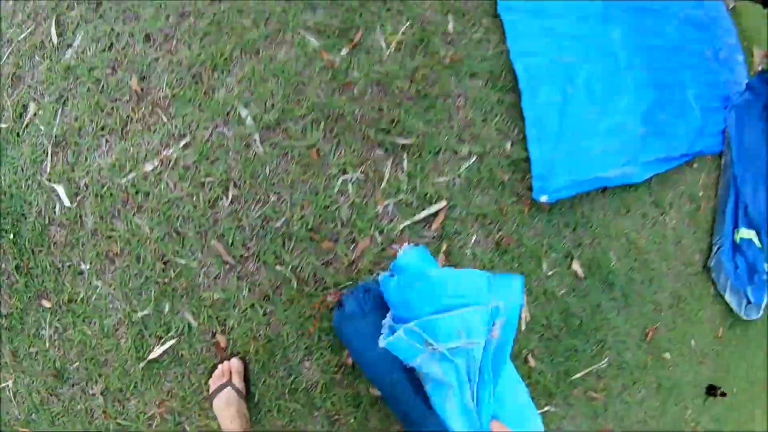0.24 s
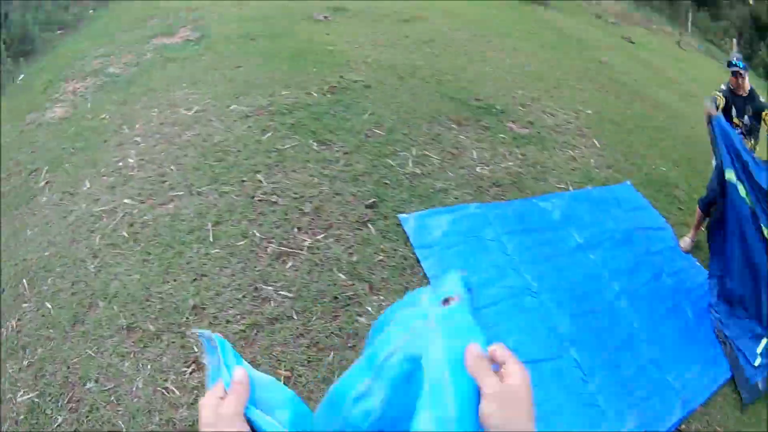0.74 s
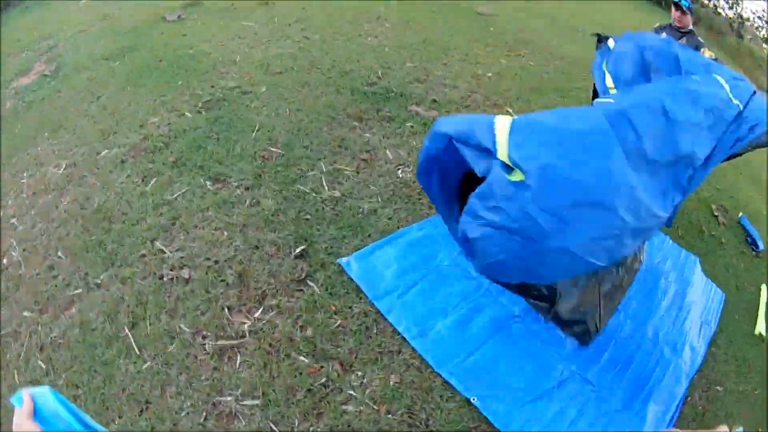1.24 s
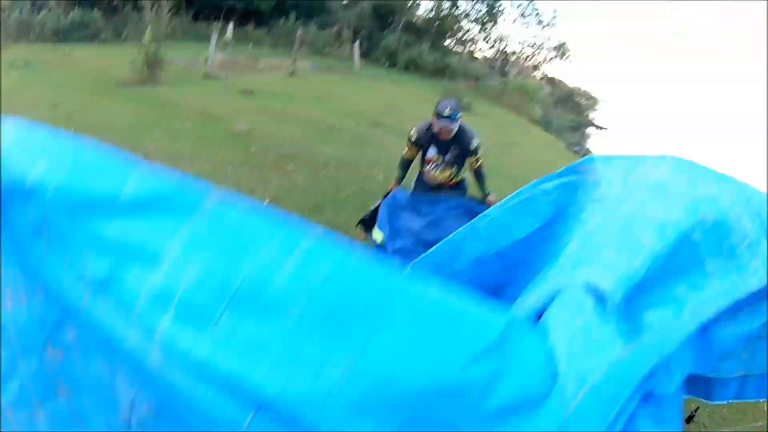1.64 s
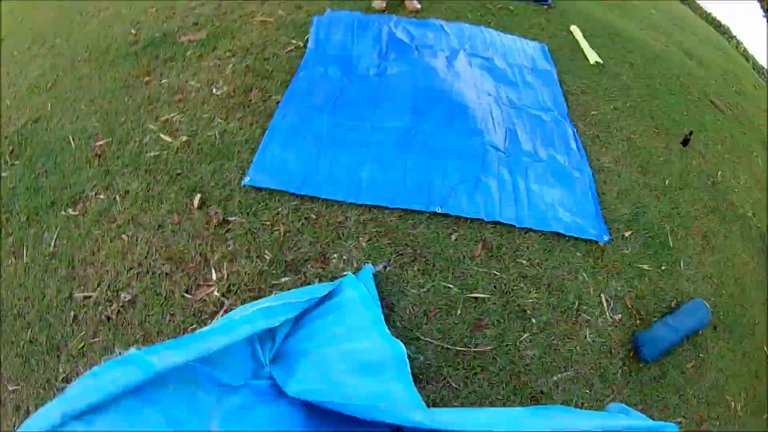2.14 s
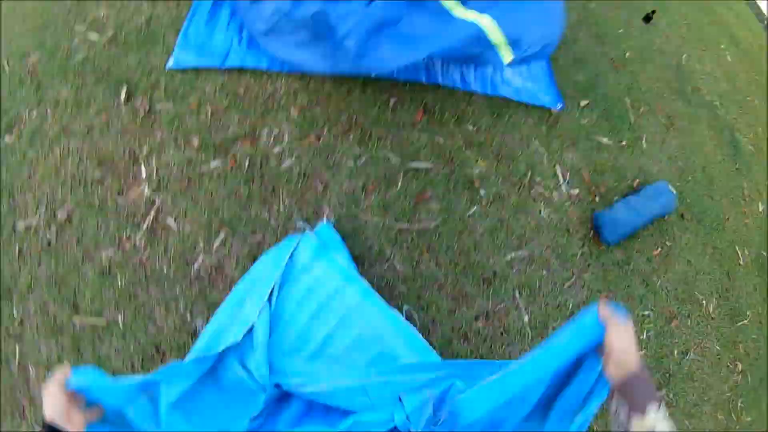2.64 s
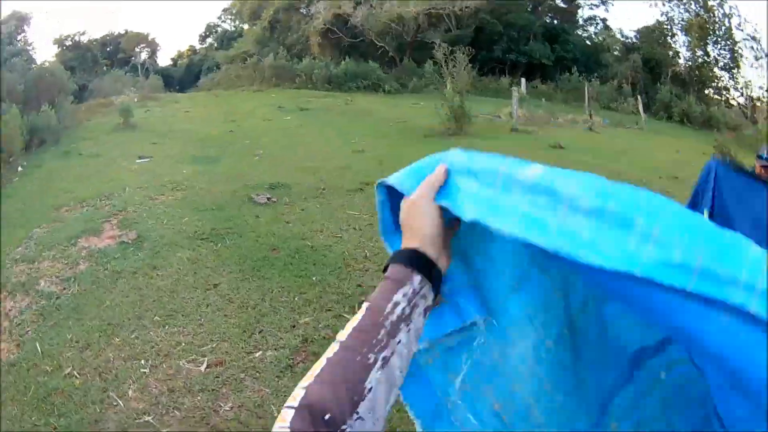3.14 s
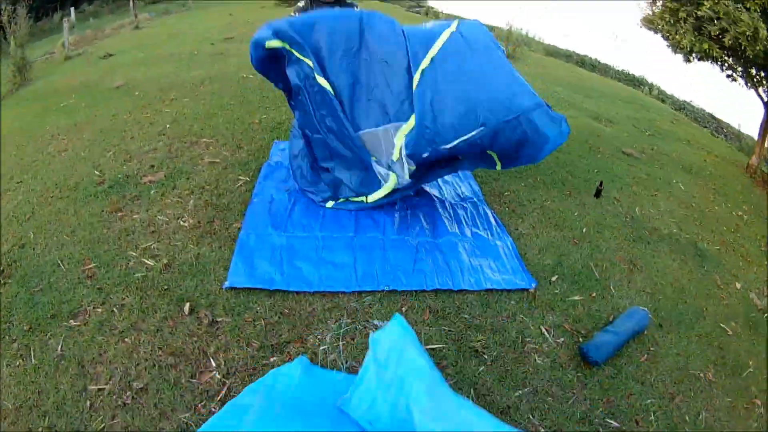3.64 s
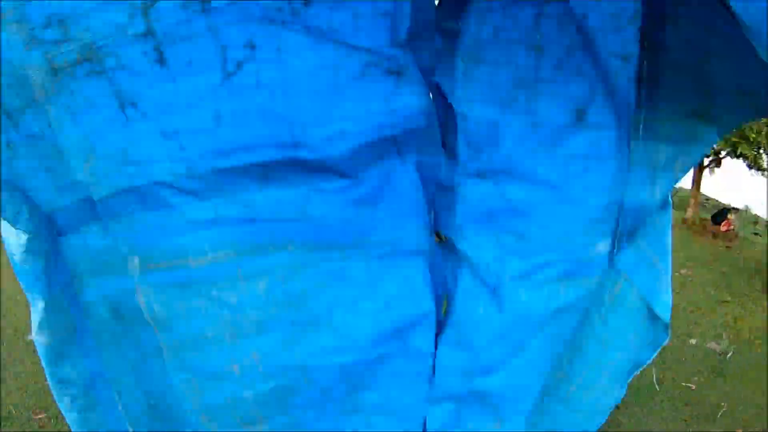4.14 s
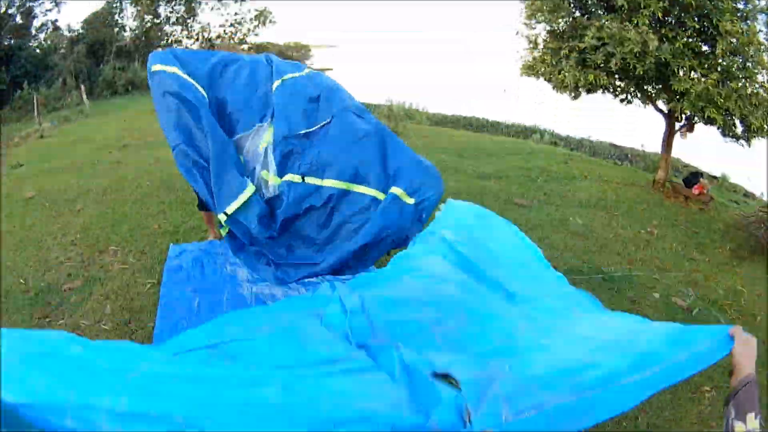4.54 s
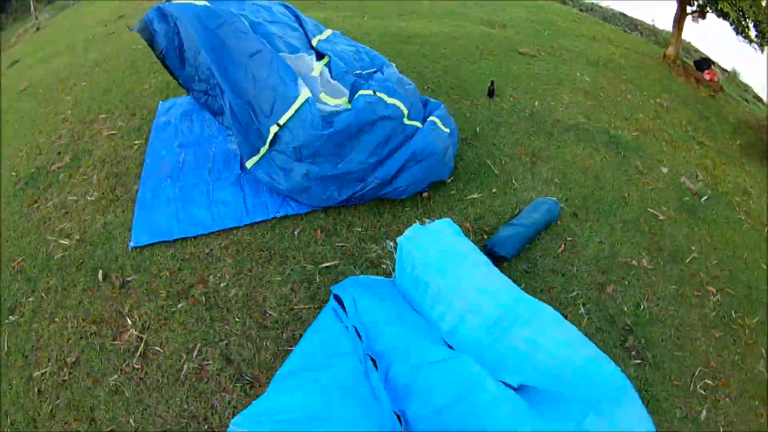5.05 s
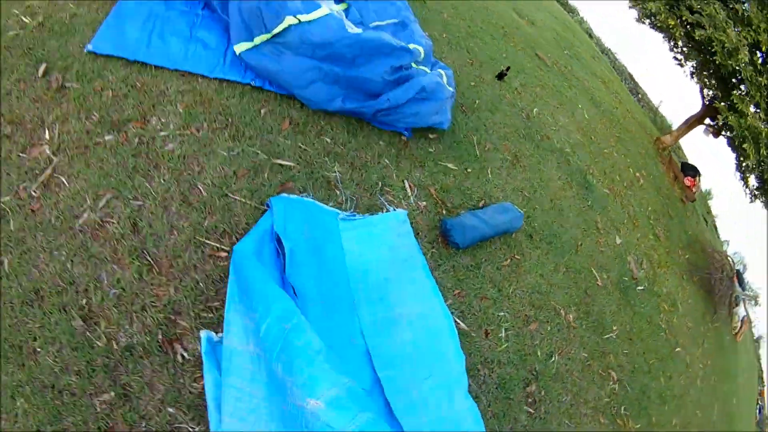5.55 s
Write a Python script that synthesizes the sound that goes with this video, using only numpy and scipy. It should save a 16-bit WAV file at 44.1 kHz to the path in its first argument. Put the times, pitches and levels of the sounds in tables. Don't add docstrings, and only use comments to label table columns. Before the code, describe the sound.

A large plastic tarp is handled and shaken at arm's length outdoors, dry and without echo. Small rustles lead into bursts of dense crackle with short woody pops, bright ticks and dull air-pushing flaps. The strongest snap comes near the first second, another hard one just after four, then it subsides into light crinkling. Soft air hiss, puffs on the microphone and a distant machine hum lie behind.

```python
import sys
import numpy as np
from scipy import signal
from scipy.fft import rfft, irfft, next_fast_len
from scipy.io import wavfile
from scipy.ndimage import uniform_filter1d, map_coordinates

SR = 44100
rng = np.random.default_rng(int(sys.argv[2]) if len(sys.argv) > 2 else 0)


def store_pcm(level_fs):
    pcm = np.round(np.clip(level_fs, -1, 1) * 32767).astype(np.int16)
    wavfile.write(sys.argv[1], SR, np.atleast_2d(pcm).T)


def invert_db(level):
    return 10 ** (np.asarray(level, dtype=float) / 20)


N = 255824

# (frequency [Hz], level [dB per Hz])
SHEET = [(24, -32), (45, -20.5), (250, -5.5), (370, -6.5), (850, -4.5), (2050, -2.5), (3200, -9),
         (4700, -16), (5800, -19.5), (7700, -27.5), (9200, -25), (11800, -34), (15500, -49)]
# (time [s], peak [dB], pitch [Hz], length [ms])
POPS = [(0.0993, -38, 2070, 0.99), (0.2271, -27, 990, 1.7), (0.433, -42, 2080, 1.2),
        (0.6851, -28, 2000, 1.2), (0.696, -25, 2200, 1.3), (0.788, -10, 1580, 0.77),
        (0.829, -19, 1450, 1.1), (0.9794, -28, 1530, 1.8), (1.546, -27, 970, 3.6), (1.698, -27, 1650, 1.2),
        (1.7263, -18, 1160, 1.1), (1.7345, -26, 1290, 1), (1.7986, -14, 850, 1.4), (1.8177, -25, 970, 1.1),
        (2.04, -33, 1410, 2.1), (2.1361, -25.5, 1190, 1.1), (2.1484, -27, 1120, 1.8),
        (2.2174, -27, 1530, 0.82), (2.7111, -25, 1400, 0.84), (2.7906, -24, 1000, 1.8),
        (3.1081, -28, 1430, 1.3), (3.713, -24, 1370, 2.1), (3.8794, -19.5, 1110, 0.89),
        (4.1709, -11.5, 970, 5), (4.7628, -37, 1500, 2.3), (4.7774, -35, 1890, 0.69),
        (4.9568, -33, 1050, 1.6), (5.4312, -34.5, 1500, 1), (5.4762, -30, 1410, 1.2)]


def unit(x):
    return x / np.sqrt(np.mean(x ** 2) + 1e-20)


def along(points, hz):
    f, v = np.transpose(points)
    return np.interp(np.log(hz + 1), np.log(f + 1), v)


def in_time(s, values):
    return np.interp(np.arange(N) / SR, s, values)


def wobble(rate):
    knots = rng.standard_normal(400)
    return map_coordinates(knots, [np.arange(N) * rate / SR], mode="wrap")


def coloured(x, gain):
    m = 2 * next_fast_len(N // 2 + 4096)
    cepstrum = irfft(np.log(gain(np.fft.rfftfreq(m, 1 / SR)) + 1e-6), m)
    cepstrum[1:m // 2] *= 2
    cepstrum[m // 2 + 1:] = 0
    return irfft(rfft(x, m) * np.exp(rfft(cepstrum)), m)[:N]


def shaped(bumps):
    return lambda hz: invert_db(sum(db * np.exp(-.5 * ((hz - c) / w) ** 2) for c, w, db in bumps))


def snaps(centre_s, peak, hz, length_ms, size, turn=1):
    t = np.arange(-size, size) / SR
    hump = np.cos(np.pi * np.clip(t / length_ms[:, None] * 1000, -.5, .5)) ** 2
    phase = turn * rng.random((len(hz), 1))
    wave = peak[:, None] * hump * np.cos(2 * np.pi * (hz[:, None] * t + phase))
    at = (centre_s * SR).astype(int)[:, None] + np.arange(2 * size)
    return np.bincount(at.ravel(), wave.ravel(), N + SR)[size:N + size]


def single(rows, size):
    s, peak_db, hz, length_ms = np.transpose(rows)
    return snaps(s, invert_db(peak_db), hz, length_ms, size)


def humps_db(rows):
    s, db, length_ms = np.transpose(rows)
    return snaps(s, db, 0 * s, length_ms, size=4096, turn=0)


def outdoors():
    # (frequency [Hz], level [dB per Hz])
    air_colour = [(15, -19), (25, -7.5), (233, 3.5), (305, -11), (1380, 2.5), (2060, -0.5), (5570, -34),
                  (7910, -24), (15500, -30)]
    # (time [s], level [dB])
    puff_levels = [(0, -77), (.32, -61), (.75, -88), (.86, -63), (1.4, -59.5), (1.87, -56), (1.94, -70),
                   (2.2, -57), (2.64, -66), (2.73, -50.5), (3.1, -62), (3.6, -71), (4.13, -67), (4.33, -64),
                   (4.55, -61.5), (4.95, -68), (5.23, -58.5), (5.8, -69)]
    # (frequency [Hz], level [dB per Hz])
    buffet_colour = [(12, -48), (25, -4), (55, -7), (90, -2), (200, -44.5), (400, -80)]
    # (frequency [Hz], width [Hz], level [dB])
    hum_tones = [(127, 13, -69), (230, 30, -69)]
    hiss = invert_db(-61.0) * unit(coloured(rng.standard_normal(N), lambda hz: invert_db(along(air_colour, hz))))
    buffet = coloured(rng.standard_normal(N), lambda hz: invert_db(along(buffet_colour, hz)))
    puffs = unit(invert_db(2.0 * wobble(10.0)) * buffet)
    air = hiss + invert_db(-5 + in_time(*np.transpose(puff_levels))) * puffs
    for centre, width, db in hum_tones:
        tone = coloured(rng.standard_normal(N), lambda hz: 1 / (1 + ((hz - centre) / width) ** 2))
        air = air + invert_db(db) * unit(tone)
    return air


def thumps():
    # (time [s], peak [dB], pitch [Hz], length [ms])
    fold_pushes = [(.225, -45, 133, 23), (.9, -46, 228, 72), (1.03, -40.5, 240, 30), (1.05, -40.5, 130, 60),
                   (1.055, -49, 188, 25), (1.86, -43, 59.7, 28), (2.85, -38, 500, 20),
                   (2.855, -52, 260, 26), (2.892, -47, 230, 23), (2.94, -47, 480, 22),
                   (5.232, -50, 51.3, 54)]
    return single(fold_pushes, size=2048)


def rings():
    # (time [s], peak [dB], pitch [Hz], length [ms])
    taut_patches = [
        (4.7645, -41, 2900, 5),
        (5.6, -48, 1750, 7),
        (4.96, -44, 900, 6),
        (2.83, -36, 600, 11),
    ]
    return single(taut_patches, size=512)


def ticks():
    # (time [s], peak [dB], pitch [Hz], length [ms])
    stiff_creases = [(0.3003, -50, 5910, 0.6), (1.2315, -52, 6430, 0.5), (1.6462, -49, 5570, 1.4),
                     (1.6975, -59, 8440, 0.4), (1.7261, -43, 7310, 0.54), (2.0529, -48, 7310, 0.57),
                     (2.2351, -55, 7250, 0.65), (2.3233, -54, 6670, 0.7), (2.8486, -60, 7580, 1.0),
                     (2.9162, -48, 6700, 0.35), (2.9795, -44.5, 5800, 1.4), (3.0241, -49, 7620, 0.31),
                     (3.5195, -52, 7470, 0.37), (3.5248, -57, 6110, 0.74), (3.5425, -68, 6800, 0.7),
                     (4.4078, -63, 7840, 1.3), (4.4581, -58, 6470, 0.5), (4.7628, -53, 7930, 0.34),
                     (4.7791, -55, 6870, 0.9), (5.0807, -52, 7920, 0.59), (5.1699, -55, 6660, 0.6),
                     (5.7704, -52, 7690, 0.5)]
    return single(stiff_creases, size=64)


def prickles():
    # (time [s], peak [dB], pitch [Hz])
    stiff_panels = [(0.033, -37, 2650), (0.0972, -36.5, 2650), (0.2249, -43, 2610), (0.2688, -42, 2830),
                    (0.4319, -32.5, 2640), (0.6823, -42, 3590), (0.7248, -26, 3080), (0.811, -20, 2680),
                    (0.9782, -43, 2660), (1.1458, -42, 3570), (1.4576, -48, 2700), (1.509, -40, 2620),
                    (1.6955, -42, 3690), (1.725, -38, 3520), (1.7744, -26, 3430), (2.0896, -36, 2800),
                    (2.146, -39, 2780), (2.2134, -45, 2600), (2.3216, -39, 2600), (2.384, -31, 2620),
                    (2.5526, -37, 2640), (2.7372, -30, 2600), (2.8923, -47, 3500), (2.9615, -41, 2600),
                    (2.979, -43, 2680), (3.106, -39, 2600), (3.6114, -44, 3460), (3.6813, -29, 2660),
                    (3.714, -29, 2640), (3.7594, -39, 2810), (3.9789, -36.5, 2630), (4.0716, -35, 3400),
                    (4.478, -45, 2640), (4.7621, -51, 2850), (5.26, -41, 2700), (5.3792, -43, 2800),
                    (5.4296, -46, 3540), (5.475, -46, 2800), (5.6017, -45, 2640), (5.67, -39, 2660)]
    length_ms = 1.4
    return single([(s + 0.001075, db + 1, hz, length_ms) for s, db, hz in stiff_panels], size=64)


def clicks():
    # (time [s], peak [dB], pitch [Hz])
    lone_creases = [(0.0763, -38, 1100), (0.0912, -37, 1380), (0.8564, -23, 990), (1.3651, -31, 1920),
                    (1.8847, -24, 1310), (2.5124, -35, 1200), (2.7834, -23, 840), (2.7967, -24, 1200),
                    (3.1199, -26, 2070), (3.1788, -25, 700), (3.3112, -29, 700), (3.4476, -39, 1550),
                    (3.7873, -27, 1010), (3.9218, -30, 1740), (3.9612, -28, 2040), (4.1058, -22, 1140),
                    (4.1732, -17, 950), (4.1949, -21, 950), (4.2313, -25, 1440), (4.2857, -26, 1290),
                    (4.2962, -29, 1060), (4.8405, -38, 1360), (4.9461, -39, 1480), (5.2413, -40, 1870),
                    (5.5018, -39, 1250), (5.5955, -36, 1120)]
    cycles = 1.6
    return single([(s, db, hz, 1000 * cycles / hz) for s, db, hz in lone_creases], size=128)


def pops():
    # (time [s], peak [dB])
    crinkles = [(0.0444, -26), (0.1623, -29), (0.217, -31), (0.234, -30), (0.733, -23), (0.798, -21),
                (0.81, -22), (0.852, -15), (1.8466, -17), (2.895, -32), (3.209, -28), (3.9837, -14),
                (4.4078, -36), (4.516, -41), (5.3205, -30), (5.4441, -29), (5.61, -34), (5.625, -31),
                (5.6711, -25)]
    pitch_hz, length_ms = 1560, 0.85
    return single(POPS + [(s, db - 5, pitch_hz, length_ms) for s, db in crinkles], size=256)


def cracks():
    s, peak_db, _, length_ms = np.transpose(POPS)
    peak = invert_db(peak_db + rng.normal(0, 4.9, len(s))) / (1 + length_ms ** 2)
    train = np.bincount((s * SR).astype(int), peak, N)
    return coloured(train, lambda hz: invert_db(along(SHEET, hz) + 13) / (1 + (2600 / (hz + 1)) ** 6))


def handling():
    # (time [s], crackle [dB], rise [ms per 10 dB], fall [ms per 10 dB], big folds [rel dB])
    swings = [(0.222, -41, 19, 36, -5), (0.503, -38, 117, 101, -7), (0.688, -43, 7, 80, -9),
              (0.789, -27, 66, 94, -10.5), (0.857, -35.5, 7, 11, -20), (0.951, -41, 47, 96, -15),
              (1.306, -37.5, 161, 86, -16), (1.381, -40.5, 15, 19, -5), (1.544, -36, 122, 113, -8.5),
              (1.734, -34.5, 8, 27.0, -12), (1.79, -29, 32, 86, -2), (1.9, -32, 166, 52, -12.5),
              (2.432, -40, 127, 79, -5), (2.643, -38, 134, 53, -12), (2.732, -31.5, 38, 44, -7),
              (2.798, -30, 70, 32, -12), (3.109, -38, 37, 99, -4), (3.222, -31.5, 118, 105, -9),
              (3.708, -34, 63, 192, -10.5), (3.858, -37, 99, 96.5, -5), (3.992, -32, 47, 89, -12),
              (4.094, -29, 60, 84, -5.5), (4.174, -28, 48, 81, -5), (4.28, -35.5, 77, 24, -43)]
    # (time [s], crackle [dB], rise [ms per 10 dB], fall [ms per 10 dB])
    stirs = [(0.04, -44, 59, 23), (0.091, -47, 94.0, 35), (0.17, -46, 48, 16), (0.294, -44.5, 51, 27),
             (0.379, -49, 19, 5), (1.037, -43, 16, 95), (1.212, -40.5, 14.5, 54), (1.46, -45, 40.0, 6),
             (2.046, -39.5, 18, 25), (2.145, -41, 125, 52), (2.229, -42.5, 40.0, 69),
             (2.843, -44.5, 12.0, 152), (3.312, -35.5, 48, 4), (3.41, -47, 60, 21.5), (3.532, -51, 35.5, 1),
             (4.399, -50.5, 11, 69), (4.481, -48.5, 62.5, 29), (4.52, -50.5, 47, 29),
             (4.587, -52.5, 48, 78), (4.689, -49.5, 60, 39), (4.773, -46.5, 23, 111), (4.843, -48, 33, 64),
             (4.954, -51, 30, 27), (5.038, -45.5, 96, 78), (5.132, -51.5, 65, 49.0), (5.284, -49, 142, 112),
             (5.407, -50, 159.0, 21.0), (5.442, -48.5, 44, 26.0), (5.481, -46.5, 32.0, 37),
             (5.619, -45, 78, 129.0), (5.717, -47, 52, 255)]
    stir_billow_db, rest_db = -9.5, -60
    moves = swings + [(*row, stir_billow_db) for row in stirs]
    s, db, rise_ms, fall_ms, billow_db = np.transpose(moves)[:, :, None]
    t = np.arange(0, N / SR, .002)
    late_ms = 1000 * (t - s)
    power = invert_db(db - 10 * np.maximum(-late_ms / rise_ms, late_ms / fall_ms)) ** 2
    total = power.sum(0) + invert_db(rest_db) ** 2
    billow = (power * billow_db).sum(0) / power.sum(0)
    return in_time(t, 10 * np.log10(total)), in_time(t, billow)


def tension_db():
    # (time [s], level [dB], length [ms])
    slacks = [(.209, -8, 16), (1.688, -6, 16), (4.185, 0, 20), (.63, -3, 160), (.781, -4, 38),
              (1.766, -3, 12), (2.129, -6, 14), (4.05, 0.5, 34), (.67, -3, 28), (1.712, -10.5, 33),
              (2.032, -4, 14), (2.209, -4, 14), (2.526, -4, 32), (3.005, -6, 24), (3.97, -4, 20),
              (4.35, -5, 43), (4.753, 0, 17), (5.42, -4, 28), (5.458, -2, 28)]
    # (time [s], level [dB], length [ms])
    jolts = [(0.029, 1, 35), (0.097, -2, 23), (0.226, 0, 57), (0.254, -4, 27), (0.296, 0, 25),
             (0.375, 1, 23), (0.663, -3, 36), (0.686, 3, 32), (0.797, -3, 16), (0.857, 2.5, 20),
             (0.981, 1, 18), (1.354, -4.5, 43), (1.378, 5, 37), (1.474, -3.5, 26), (1.546, -2.5, 50),
             (1.669, -1, 26), (1.713, 6, 23), (1.726, 1.5, 22), (1.789, -3, 12), (1.855, 2, 60),
             (2.043, 3.5, 23), (2.142, -2, 8), (2.217, 1, 19), (2.232, 1, 13), (2.678, -1, 40),
             (2.718, 0.5, 34), (2.737, 0, 19), (2.782, 3, 9.1), (2.798, -4, 47), (2.832, -2, 22),
             (2.898, 9.5, 16), (3.106, 1.5, 25), (3.207, 5, 20), (3.338, -5.5, 40), (3.725, -4.5, 22),
             (3.879, -4, 16), (3.906, -3, 35), (3.969, -1, 20), (3.992, 3, 23), (4.121, -3.5, 23),
             (4.143, 1.5, 27), (4.171, 0.5, 26), (4.2, -4, 18), (4.288, -1.5, 36), (4.763, -2, 18),
             (4.84, 1, 23), (4.957, 5, 31), (5.487, -2, 18), (5.611, 1.4, 13), (5.626, 1, 40)]
    jitter = map_coordinates(rng.standard_normal(N // 200 + 2), [np.arange(N) / 200])
    return humps_db(slacks + jolts) + 0.7 * wobble(90) + 0.3 * wobble(40) + 0.5 * jitter


def slips(count, spread_db, top_db):
    when, strength, side = rng.random((count, 3)).T
    size = invert_db(np.minimum(-spread_db * np.log(1 - strength), top_db)) * np.sign(side - .5)
    return unit(np.bincount((when * N).astype(int), size, N))


def panels(count, centre_hz, spread, cycles, spread_db, top_db):
    when, strength = rng.random((count, 2)).T
    hz = np.clip(centre_hz * np.exp(spread * rng.standard_normal(count)), 300, 6000)
    peak = invert_db(np.minimum(-spread_db * np.log(1 - strength), top_db) + along(SHEET, hz))
    length_ms = np.minimum(1000 * cycles / hz, 12)
    return unit(snaps(when * N / SR, peak, hz, length_ms, size=288))


def patchy(x, depth_db):
    z = signal.stft(x, nperseg=256)[2]
    field = uniform_filter1d(rng.standard_normal(z.shape), size=3, axis=0)
    field = uniform_filter1d(field, size=12, axis=1)
    return signal.istft(z * invert_db(depth_db * unit(field) - depth_db ** 2 / 9), nperseg=256)[1][:N]


def rustle():
    # (time [s], tautness [dB], weave rub [dB])
    grip = [(0, 0.5, -0.5), (.5, 5, -1.5), (.8, 5.5, -1), (1.55, 0, 1.5), (1.68, -3, -5), (1.79, 2.5, 5.5),
            (1.93, 5.5, 4.5), (2.05, 0.5, 5.5), (2.2, -2.5, 6.5), (2.33, 4.5, 3.5), (2.44, 2.5, 5.5),
            (2.6, 1, 5), (2.76, -5.5, 5.5), (2.9, 0, 0), (3.2, 4.5, -3), (3.6, -1, 7), (3.88, 1, 4),
            (4.02, -2.5, -4), (4.3, -3, 5), (4.8, -1, 3.5), (4.95, -1.5, 5.5), (5.08, -0.5, 5),
            (5.8, -1, 5.5)]
    # (time [s], level [dB], length [ms])
    bellies = [
        (1.04, 9.5, 390),
        (1.25, 5, 81),
        (2.23, 7.5, 69),
        (2.55, 2, 220),
        (2.9, 5, 650),
        (4.37, 2.5, 170),
        (4.57, 7, 81),
        (4.96, 9, 47),
        (5.23, 5.5, 88),
        (5.53, 8, 210),
    ]
    # (time [s], level [dB], length [ms])
    rasps = [(.03, 1, 30), (.165, 6, 25), (.29, 8.5, 27), (.318, -9, 30), (.37, 6, 27), (.73, 3, 65),
             (.79, 1, 54), (.84, 3, 92), (.89, 1, 37), (1.111, 6, 30), (1.192, 4, 25), (1.392, 6, 12),
             (1.423, -5, 30), (1.485, -2, 9.1), (1.681, -7, 30), (1.87, -2, 120), (1.954, -4, 30),
             (2.055, 4, 20), (2.094, -4, 30), (2.143, -6, 30), (2.43, 4, 40), (2.55, 2.5, 78),
             (2.66, 3, 60), (2.77, -4, 90), (3.032, 4, 30), (3.13, -3, 30), (3.315, 3, 28), (3.387, 4, 15),
             (3.42, 2, 12), (3.434, 0, 6), (3.525, 13, 20), (3.592, -5, 30), (3.657, -1, 30),
             (3.72, -0.5, 50), (3.803, 0, 50), (4.025, 7, 70), (4.07, 6, 40), (4.15, 3, 26), (4.22, 2, 56),
             (4.332, 4, 25), (4.625, -1, 30), (4.764, 11, 9), (4.781, 13, 11), (4.947, -9, 30),
             (5.075, 9, 27), (5.64, 2.5, 80), (5.73, 1.5, 120)]
    edges_hz = [450, 1500, 2500, 5900]
    crackle_db, billow_db = handling()
    pull_db = tension_db()
    s, taut, rub = np.transpose(grip)
    sliding = 0.97 * (uniform_filter1d(crackle_db, int(0.068 * SR) + 1) - crackle_db)
    rasp_db = humps_db(rasps)
    folds = billow_db + humps_db(bellies) + in_time(s, -0.17 * taut)
    fine = in_time(s, 0.42 * taut) - 4
    creases = in_time(s, -9 + taut + 0.22 * rub) + 0.75 * sliding + 0.45 * rasp_db
    scrape = in_time(s, -25.5 + 0.88 * taut + rub) + sliding + rasp_db
    # (level [rel dB], own slips, sliding noise, own clumps [dB], share of the pull felt)
    ranges = [(folds, .4, .9, .7, .7),
              (-0.97, 0.32, 0.74, 0.42, 0.46),
              (fine, 0.47, 0.73, 0.9, 0.85),
              (creases, .55, .7, .7, .8),
              (scrape, .55, .8, .9, .6)]
    shared = slips(count=10000, spread_db=3.0, top_db=9.5)
    edges = [0, *edges_hz, SR]
    below = lambda hz, edge: 1 / (1 + (hz / (edge + 1)) ** 12)
    total = np.zeros(N)
    for k, (rel_db, own, slide, clump_db, felt) in enumerate(ranges):
        share = lambda hz: np.abs(below(hz, edges[k + 1]) - below(hz, edges[k]))
        band = lambda hz: invert_db(along(SHEET, hz)) * np.sqrt(share(hz))
        own_slips = slips(count=11000, spread_db=2.5, top_db=14.5)
        drive = 0.52 * shared + own * own_slips + slide * rng.standard_normal(N)
        clumped = invert_db(felt * pull_db + clump_db * wobble(45)) * unit(coloured(drive, band))
        total += invert_db(crackle_db + rel_db) * clumped
    popping = panels(count=2500, centre_hz=1410, spread=0.65, cycles=1.53, spread_db=3.0, top_db=3.5)
    ringing = panels(count=1600, centre_hz=1200, spread=.42, cycles=5, spread_db=2.0, top_db=9)
    pitched = popping + 0.87 * ringing
    return invert_db(-2.5) * patchy(total, depth_db=1.11) + invert_db(crackle_db + pull_db - 11) * pitched


def round_housing(sheet):
    # (frequency [Hz], width [Hz], level [dB])
    feet_colour = [(3080, 180, -5), (3630, 140, 1), (5500, 810, -5.5), (7900, 550, 2), (10500, 1250, -4.5)]
    front_colour = [(5750, 300, -6.5), (7450, 600, 5.5), (8600, 350, -1.5)]
    aside_colour = [(6550, 380, -4.5), (7850, 550, 4.5)]
    # (time [s], lowering [0 held up - 1 down])
    lowering = [(0, 0.24), (1.6, 0.16), (1.8, .5), (2.0, 0.71), (2.6, 0.86), (2.93, 0.67), (3.02, 0.36),
                (3.2, 0.46), (4.2, 0.54), (4.6, 0.28), (5.1, 0.6), (5.5, .5), (5.65, 0.97), (5.8, .8)]
    # (time [s], bearing [0 in front - 1 aside])
    bearing = [(0, 0.74), (1.3, 0.71), (1.7, 0), (1.95, .05), (2.1, 0.62), (2.85, .4), (3.05, 1),
               (3.45, 0.73), (3.7, 0.3), (4.4, 0.056), (5.2, 0.37), (5.8, 0.41)]
    low = np.clip(in_time(*np.transpose(lowering)), 0, 1)
    sheet = (1 - low) * sheet + low * coloured(sheet, shaped(feet_colour))
    aside = np.clip(in_time(*np.transpose(bearing)), 0, 1)
    in_front = coloured(sheet, shaped(front_colour))
    return (1 - aside) * in_front + aside * coloured(sheet, shaped(aside_colour))


def scene():
    events = thumps() + rings() + ticks() + pops() + cracks()
    events = coloured(events, lambda hz: hz ** 2 / (hz ** 2 + 30 ** 2))
    sheet = events + prickles() + clicks() + rustle()
    return (outdoors() + round_housing(sheet))[None]


def band_limit(x):
    return signal.sosfilt(signal.butter(12, 15640, fs=SR, output="sos"), x)


def record(dry):
    top = lambda hz: shaped([(15700, 450, -4)])(hz) / (1 + (hz / 15900) ** 120) + 1e-4
    mix = coloured(dry[0], top)[None]
    return band_limit(mix)


dry = scene()
out = record(dry)
store_pcm(out)
```